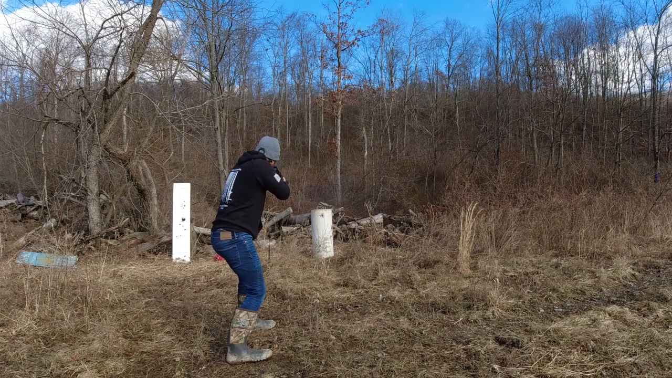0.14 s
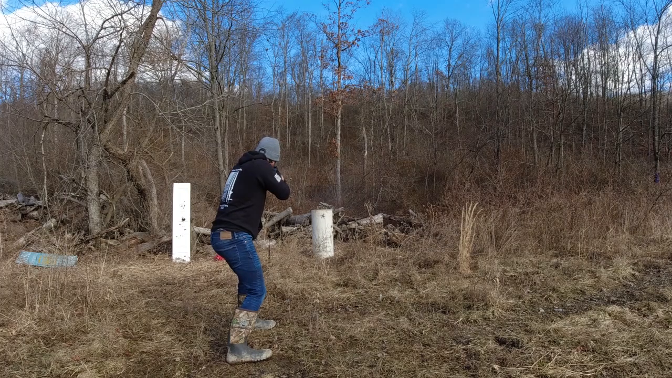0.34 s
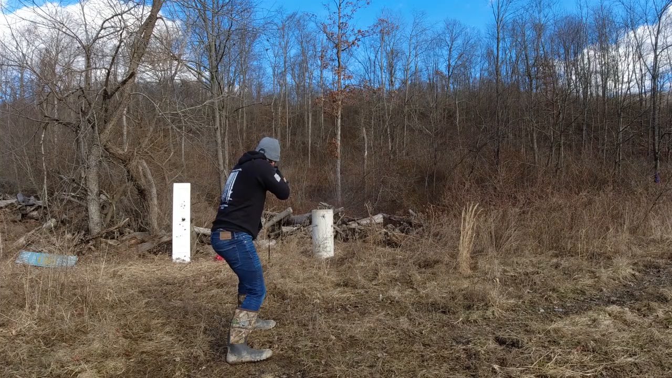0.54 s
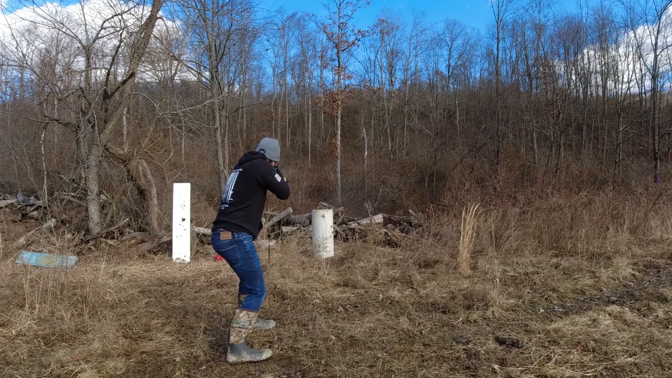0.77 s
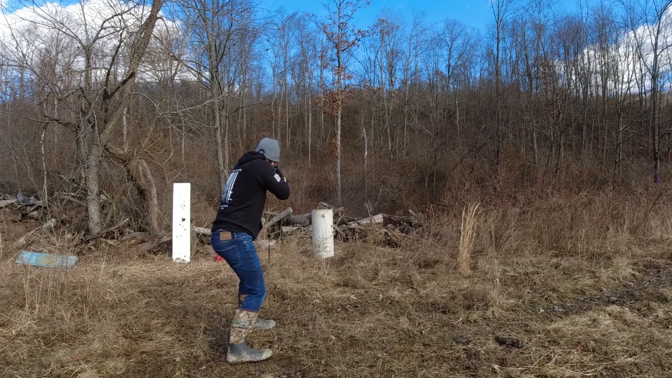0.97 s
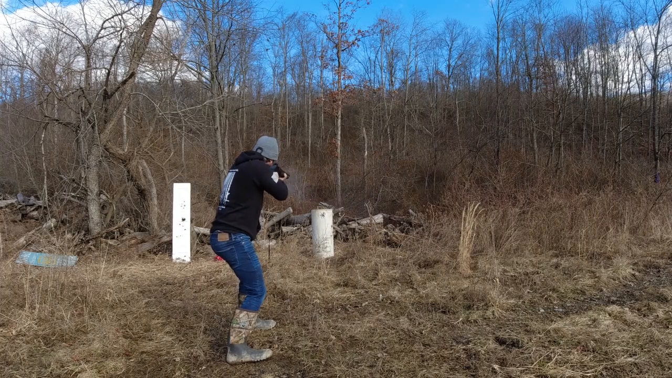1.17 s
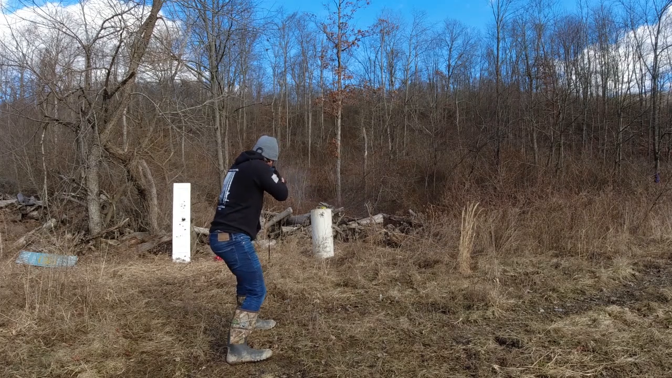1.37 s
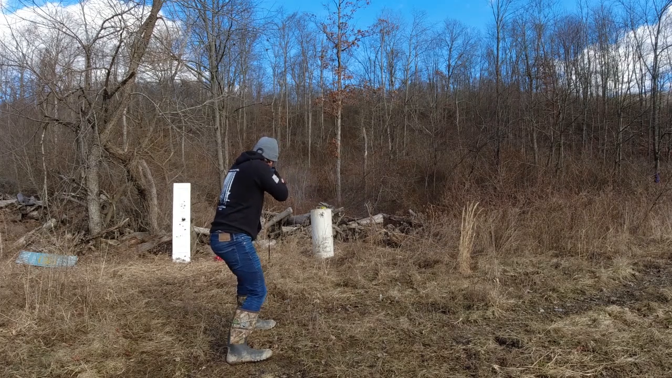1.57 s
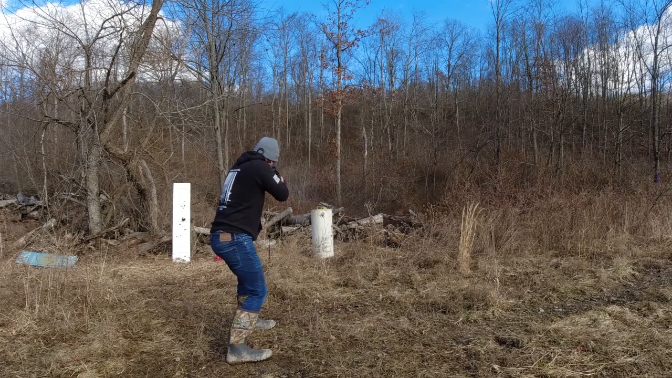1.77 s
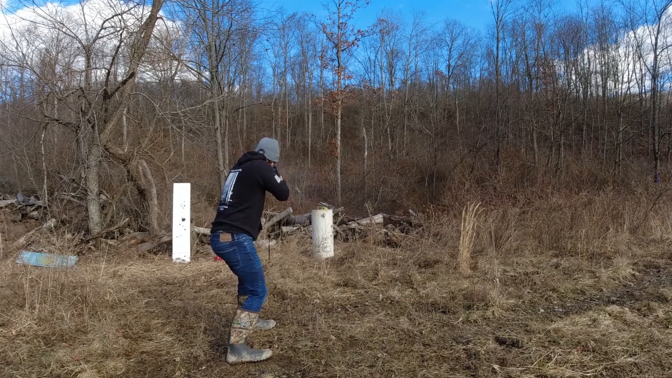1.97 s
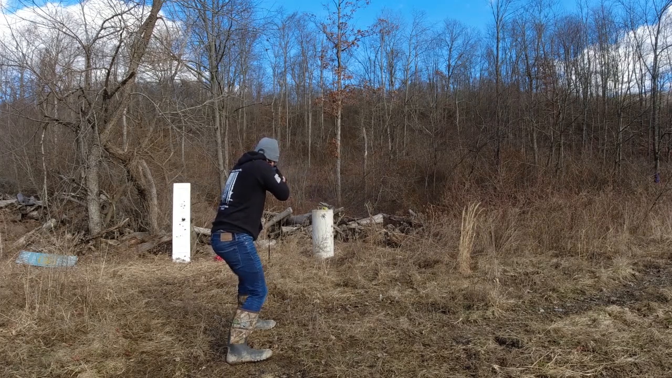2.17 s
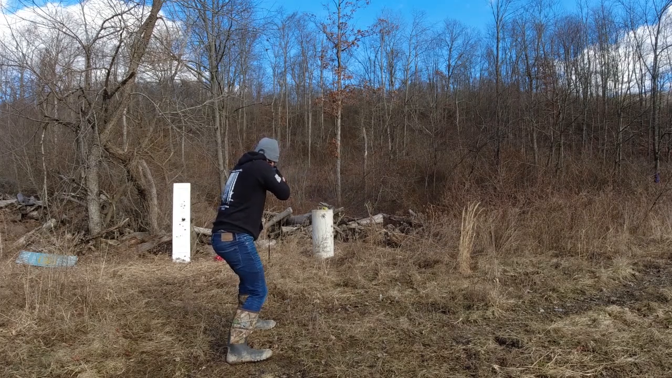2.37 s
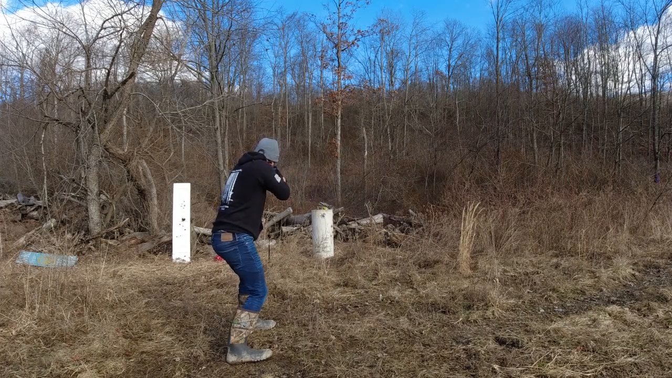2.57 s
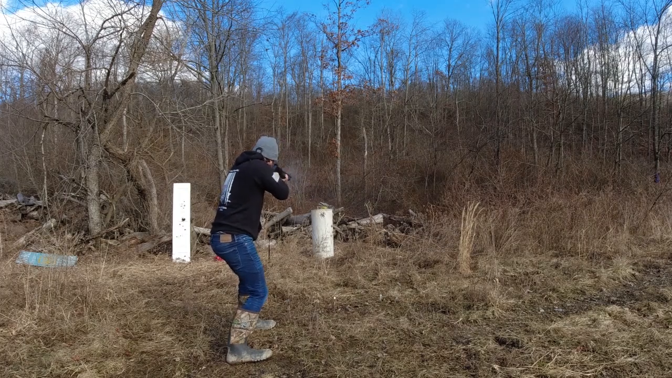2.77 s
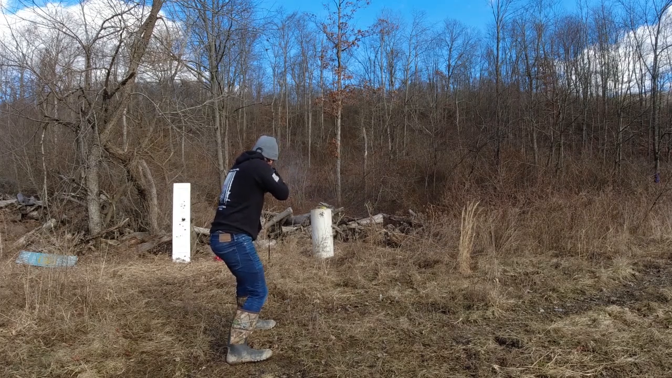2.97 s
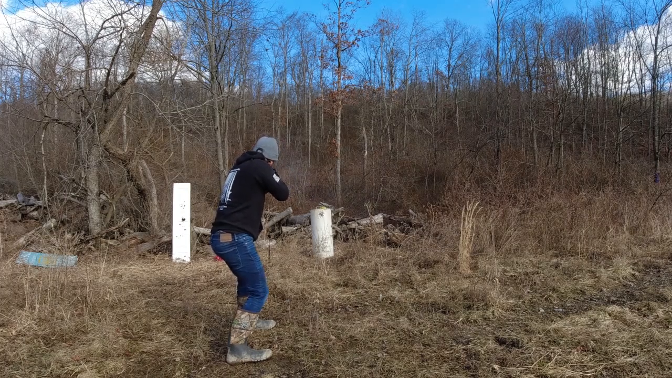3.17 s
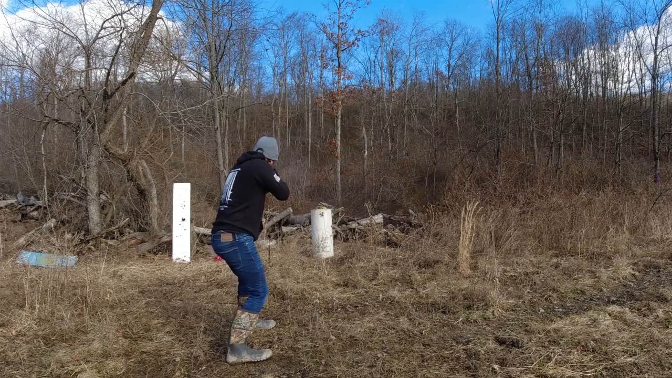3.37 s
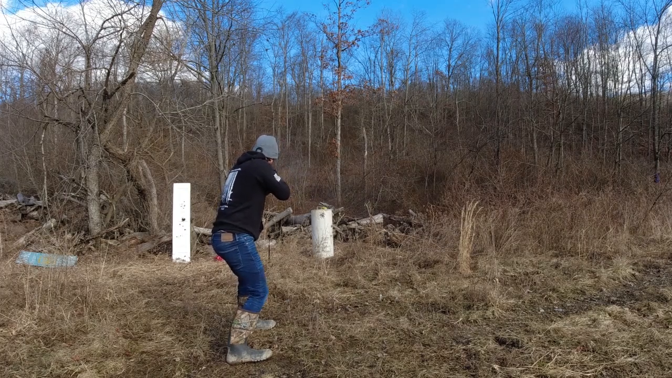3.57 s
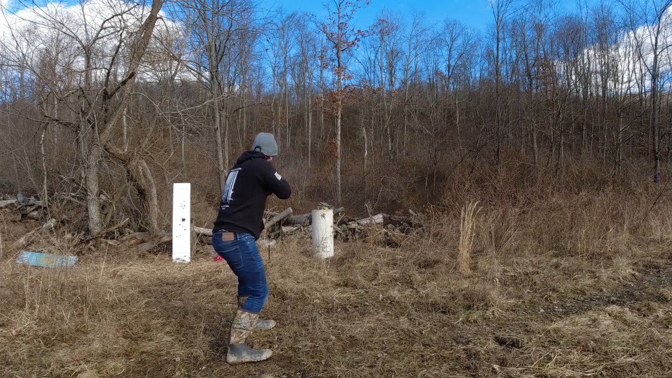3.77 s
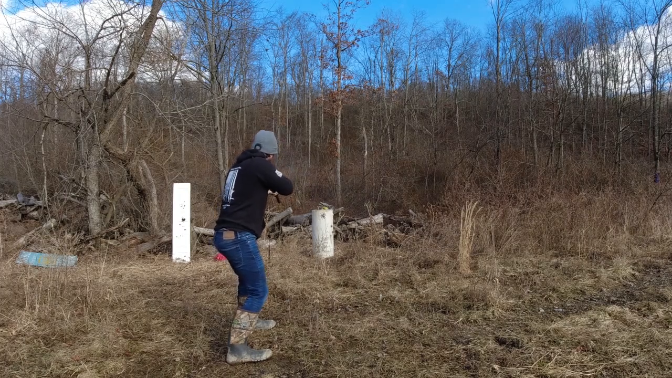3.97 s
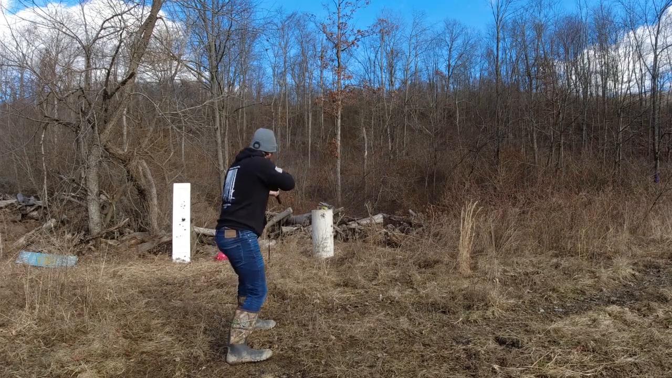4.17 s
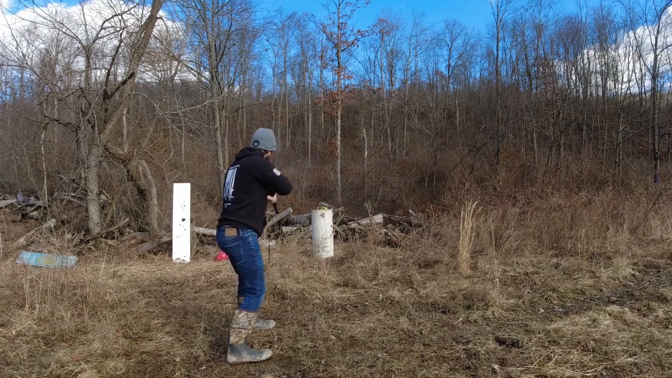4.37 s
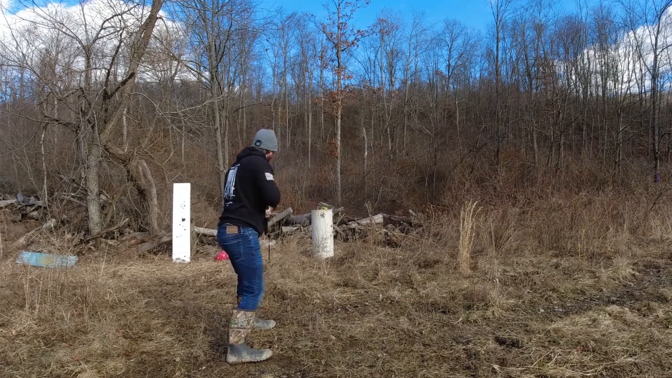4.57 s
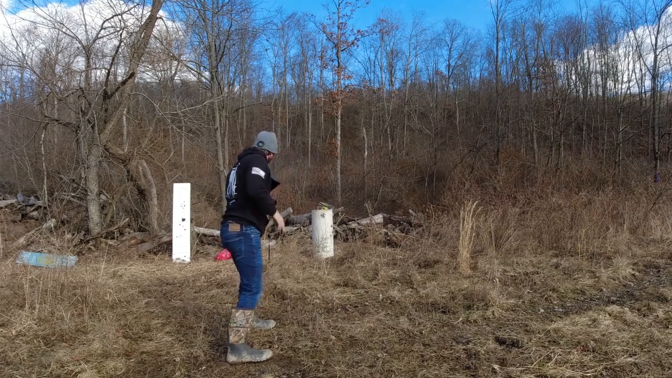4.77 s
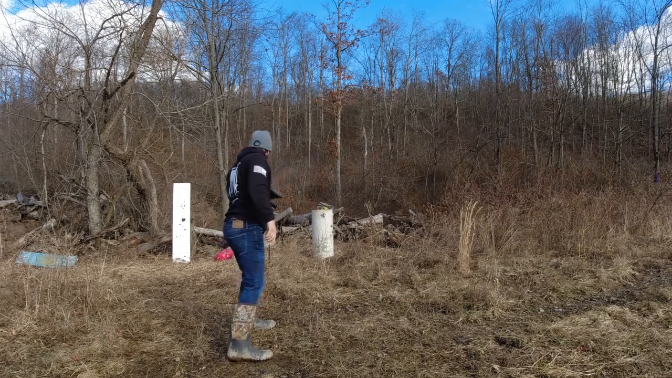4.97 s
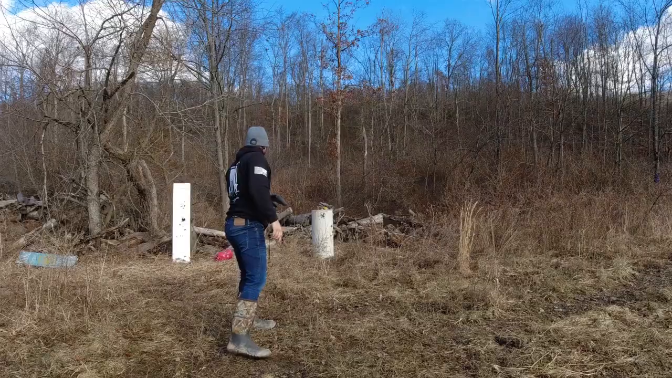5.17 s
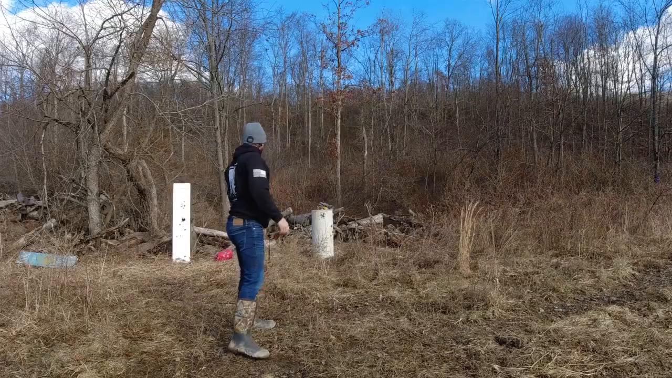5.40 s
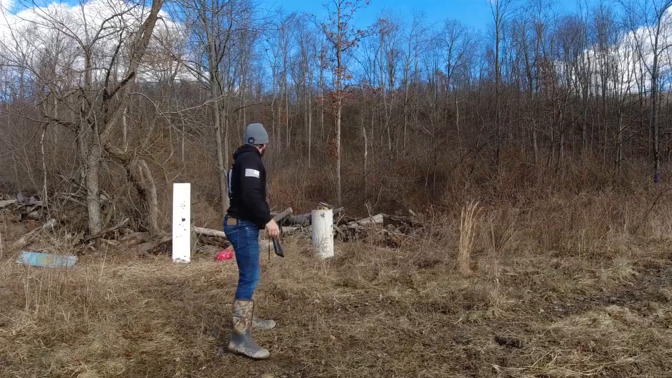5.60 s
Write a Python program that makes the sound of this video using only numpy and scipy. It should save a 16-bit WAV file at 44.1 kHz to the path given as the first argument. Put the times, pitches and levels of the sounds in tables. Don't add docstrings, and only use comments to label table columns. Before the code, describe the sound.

Outdoors in a clearing, an earlier shot's echo fades as a shotgun slide is racked back and forward with crisp steel clacks. A huge clipped blast follows, with tree slaps and rolling echo. The slide is racked again, a second blast fires, and one last backward clack follows. Stereo microphones near the shooter overload on the shots; faint distant traffic drones and swells at the end.

```python
import sys
import numpy as np
from scipy import signal
from scipy.io import wavfile

SR = 44100
rng = np.random.default_rng(int(sys.argv[2]) if len(sys.argv) > 2 else 0)


def to_wav(s):
    ch = np.atleast_2d(s).T
    pcm = np.round(np.clip(ch, -1, 1) * 32767)
    wavfile.write(sys.argv[1], SR, pcm.astype(np.int16))


def invert_db(x):
    u = np.asarray(x, float) / 20
    return 10 ** u


N = 248721
TIME = np.arange(N) / SR
BAND_EDGES = 19.5 * 2 ** np.arange(0, 9.8, .3724)
WHITE = rng.standard_normal((2, 2, N))

# f/Hz, density/dB per Hz
ROAD = [(20, 0.5), (28, 2.5), (45, -6.5), (70, -4.5), (100, -1), (160, -8), (300, -9), (450, -12),
        (800, -9.5), (1200, -16), (1700, -24), (2500, -38), (4000, -47.5), (9000, -59.5)]
# f/Hz, likeness/1
ROAD_LIKENESS = [(30, 0.88), (100, 1), (500, 0.81), (1500, 0.6), (5000, .4)]
ROAD_DB = -58
# t/s, f/Hz, level/dB
ENGINE = [
    (0, 76, -69),
    (0.998, 77, -61),
    (2.2, 77.5, -57.5),
    (3.501, 73, -64),
    (4.4, 72.5, -56.5),
    (5.0, 72, -53),
    (5.64, 73.7, -49),
]

# f/Hz, level/dB, t60/s
PLATE = (273, -48, 3.0)
PELLET_FLIGHT_S = .08
# t/s, peak level/dB, f/Hz
SHELL_THUDS = [
    (2.714, -42.5, 100),
    (4.374, -42.5, 96),
]

# t/s, peak level/dB, thrown shell level/dB
RACK_BACK = [
    (0.4184, -17.5, 7.5),
    (1.9676, -17.5, -0.5),
    (3.9579, -16.5, -47),
]
# t/s, peak level/dB
RACK_FORWARD = [
    (0.6537, -22),
    (2.2225, -19.5),
]
# t from slam/s, level below it/dB, low modes level/dB, loudest f/Hz
BACK_CONTACTS = [
    (-.0347, -14.5, -43.5, 3000),
    (0, -0.5, -16.5, 2300),
    (0.013, -16, -5, 2400),
]
EJECT_CONTACTS = [
    (.031, -17, 1, 1420),
    (0.048, -38, 18, 1390),
]
FORWARD_CONTACTS = [
    (-.0927, -19.5, -28, 2490),
    (-.068, -24, -21, 2720),
    (-.0456, -12.5, -32, 2400),
    (-.030, -27, -6, 1950),
    (-.018, -23, -6, 2330),
    (-.008, -9, -28, 2500),
    (0, 0, -19, 2530),
]
# t/s, peak level/dB, f/Hz
TICKS = [
    (0.5257, -49, 1140),
    (0.9413, -60, 2500),
    (4.463, -61, 3100),
    (4.515, -69.5, 3100),
    (4.73, -74, 4670),
]
# f/Hz, level/dB, t60/s
ACTION_MODES = [(920, -22, 0.09), (1263, 21, 0.075), (1498, -8, 0.016), (1842, -7, 0.047),
                (2360, 3.5, 0.029), (2765, -21, 0.037), (2840, -10, 0.01), (2850, -5.5, 0.044),
                (3145, -2.5, 0.03), (3780, -11, 0.055), (4670, -24, 0.11), (4700, -38, 0.18),
                (5450, -65, 0.21), (6700, -60, 0.08), (7700, 5, 0.049), (9300, -26, 0.19),
                (10560, 25, 0.12), (10460, -22, 0.091)]
HIGH_MODES_DB, TICK_LOW_DB, TICK_HIGH_DB = -21, -12.0, -45
# start from slam/s, end from slam/s, level/dB
RUB_BACK, RUB_EJECT = (-.048, .004, -53), (0.019, 0.07, -48.5)
RUB_FORWARD = [
    (-.093, -0.046, -55.5),
    (-.056, 0.038, -48.5),
]
# f/Hz, density/dB per Hz
RUB_COLOUR = [(880, -34), (1500, -4), (1720, -5), (1920, -1.5), (2830, -4), (4370, -12), (6830, -24),
              (12200, -9), (16000, -70)]
CLOTH_START_S, CLOTH_END_S, CLOTH_DB, CLOTH_DULL_HZ = 5.26, 5.44, -81, 4800

SHOTS = [
    -0.3,
    1.203,
    2.8155,
]
# first crack, later cracks, near slaps, far slaps, woodland roll, each level/dB
SHOT_DB = [
    (-60, -60, -60, -60, -0.5),
    (0.5, 0.5, -13, 2.5, -1.5),
    (0, -1.5, 1, 0.5, -1),
]

# f/Hz, density/dB per Hz
ROLL_COLOUR = [(35, -30), (70, -7.5), (150, -7), (450, -8), (860, -5), (3000, -17.5), (4300, -28.5),
               (16000, -40)]
# f/Hz, extra loss/dB per s
PATH_LOSS = [(80, 11.5), (400, -2), (1000, 1), (2000, 9.5), (3200, 18.5), (4500, 34.5), (8000, 49),
             (16000, 100)]
# f/Hz, likeness/1
ROLL_LIKENESS = [(60, 0.99), (180, 1), (550, 0.97), (1100, .75), (2200, 0.5), (4970, 0.1), (15000, 0.2)]
ROLL_DB, ROLL_ARRIVES_S, ROLL_SWELL_DB_PER_S = -30.5, .165, 231
NEAR_WOODS_S, NEAR_SAG_DB_PER_S = .43, 14.5
FAR_FALL_DB_PER_S, HILL_DB = 62.5, -63.5

# delay t/s, peak level/dB, f/Hz
TRUNKS = [(.0018, -6.5, 1040), (0.0288, -3, 1319), (0.035, -7.5, 501.5), (.0445, -9, 875),
          (.051, -4.5, 826), (0.0588, -2, 1170), (.100, -6, 630), (.104, -9, 850), (0.1076, -7, 1084),
          (0.1135, 1, 933.3), (.1205, -2.5, 958), (.1255, -1.5, 978.4), (.131, -13, 895), (.137, -9.5, 790),
          (.146, -15, 850), (.158, -10.5, 890), (.2045, -15.5, 760), (.2215, -14, 860), (.242, -13, 827),
          (.268, -30, 810), (.341, -16, 920), (.373, -28, 625), (.427, -24, 370)]
NEAR_S = .04

# t/s, length/s, push/1, right-to-left ratio/1
SHOVES = [
    (1.231, .045, .72, .78),
    (1.273, .064, -.86, 1.2),
    (2.818, .026, .12, .5),
    (2.843, .024, -.24, 1.4),
]
# t/s, push/1, time constant/s
CREEP = (1.338, .09, .16)
# t/s, peak level/dB, f/Hz, hold/s
BOOMS = [
    (1.228, -7.5, 356, 0.0023),
    (1.2535, -1.5, 252, 0.015),
    (2.865, -10, 281, 0.0098),
    (2.878, -4.5, 252, 0.0084),
    (2.913, -6, 256, 0.00048),
]
BOOM_SWELL_S, BOOM_CYCLES, BOOM_SAG_PER_S = .003, 6.4, 8.9

# delay t/s, level/dB, hold/s, t60/s
CRACKS = [
    (-.0005, -12.5, 0.005, .04),
    (.004, -17, 0.017, 0.052),
    (0.024, -14, .005, 0.02),
    (0.044, -17.5, .03, .25),
    (0.097, -23, 0.03, 0.22),
]
# f/Hz, density/dB per Hz
CRACK_COLOUR = [(180, -36.5), (300, -5), (749, -10), (900, 1), (1580, -1.5), (2740, -7), (3290, -2.5),
                (3640, -10.5), (8500, -22), (12700, -15.5), (16000, -20)]
# delay t/s, level/dB, hold/s, t60/s
NEAR_WASH = (.031, -17, .016, .04)
LEAD_S, LEAD_DB, LEAD_RISE_DB_PER_S = 0.023, -12, 1200

OVERLOAD = .76


def rms_one(x):
    return x / np.sqrt(np.mean(x ** 2) + 1e-20)


def at_hz(points, hz):
    f, value = np.array(points)[:, 0], np.array(points)[:, 1]
    return np.interp(np.log(hz), np.log(f), value)


def drift(rate):
    r = np.exp(-80 * np.pi * rate / SR)
    noise = rng.standard_normal(N // 40 + 2002)
    slow = signal.lfilter([1], [1, -2 * r, r * r], noise)[2000:]
    return np.interp(np.arange(N) / 40, np.arange(len(slow)), rms_one(slow))


def ring(clicks, hz, t60):
    r, w = invert_db(-60 / (t60 * SR)), 2 * np.pi * hz / SR
    return signal.lfilter([0, np.sin(w)], [1, -2 * r * np.cos(w), r * r], clicks + 1e-18)


def grains(size, per_s, spread_db):
    sizes = invert_db(spread_db * np.minimum(rng.exponential(1, size), 4)) * rng.choice([-1, 1], size)
    return sizes * (rng.random(size) < per_s / SR)


def bands(source, spectrum, likeness, extra_db=lambda hz: 0):
    out, power = 0, 0
    for k, (low, high) in enumerate(zip(BAND_EDGES, BAND_EDGES[1:])):
        hz = np.sqrt(low * high)
        if spectrum[0][0] <= hz <= spectrum[-1][0]:
            band = signal.butter(3, [low, high], "band", fs=SR, output="sos")
            mid, side = invert_db(at_hz(spectrum, hz)) * signal.sosfilt(band, source[k % 2])
            alike = np.clip(at_hz(likeness, hz), -1, 1)
            stereo = np.sqrt(1 + alike) * mid + np.sqrt(1 - alike) * side * [[1], [-1]]
            out = out + invert_db(extra_db(hz)) * stereo
            power += 2 * np.mean(mid ** 2)
    return out / np.sqrt(power)


def burst(level_db, hold, t60, length):
    t = TIME[:length] - LEAD_S
    lead = invert_db(LEAD_DB + LEAD_RISE_DB_PER_S * np.minimum(t, 0)) * (t < 0)
    decay = invert_db(-60 * np.maximum(t - hold, 0) / t60) * (t >= 0)
    return invert_db(level_db) * (lead + decay)


def add(out, s, piece):
    i = round(s * SR)
    out[..., i:i + piece.shape[-1]] += piece[..., :N - i]


def traffic():
    s, *columns = np.transpose(ENGINE)
    hz, engine_db = [np.interp(TIME, s, c) for c in columns]
    swell = drift(1.1)
    road = bands(WHITE[:, :, ::-1], ROAD, ROAD_LIKENESS, lambda hz: .4 * swell + 1.8 * drift(5.4))
    phase = 2 * np.pi * np.cumsum(hz + 2.0 * drift(12)) / SR
    engine = np.sqrt(2) * np.sin(phase)
    return road * invert_db(ROAD_DB) + engine * invert_db(engine_db + 0.56 * drift(6))


def plate():
    hz, level_db, t60 = PLATE
    hits = np.zeros(N)
    hits[[max(round((s + PELLET_FLIGHT_S) * SR), 0) for s in SHOTS]] = invert_db(level_db)
    return ring(hits, hz, t60)


def shells():
    out, length = np.zeros(N), SR // 6
    push = np.zeros(length)
    push[:60] = np.hanning(60) / 30
    for s, peak_db, hz in SHELL_THUDS:
        thud = ring(push, hz, .1) + 0.45 * ring(push, 2.3 * hz, 0.09) + .2 * ring(push, 3.6 * hz, .06)
        add(out, s, invert_db(peak_db + 4.0) * thud)
    return out


def rubs():
    start, end, db = RUB_BACK
    rows = [(s + start, s + end, db) for s, _, _ in RACK_BACK]
    start, end, db = RUB_EJECT
    rows += [(s + start, s + end, db + 0.2 * shell_db) for s, _, shell_db in RACK_BACK]
    return rows + [(s + start, s + end, db) for s, _ in RACK_FORWARD for start, end, db in RUB_FORWARD]


def rubbing():
    out = np.zeros((2, N))
    grit = 1.4 * rms_one(grains((2, 2, SR), per_s=5800, spread_db=5.0)) + .5 * WHITE[..., -SR:]
    noise = bands(grit, RUB_COLOUR, [(1500, 0.54), (6000, 0.19)]) * invert_db(1.4 * drift(60)[:SR])
    for k, (start, end, level_db) in enumerate(rubs()):
        stroke = signal.windows.tukey(round((end - start) * SR), .75)
        add(out, start, invert_db(level_db) * stroke * noise[:, 3000 * k:][:, :len(stroke)])
    length = round((CLOTH_END_S - CLOTH_START_S) * SR)
    brush = np.hanning(length) * invert_db(CLOTH_DB + 4.4 * drift(25)[:length])
    dull = signal.butter(4, CLOTH_DULL_HZ, fs=SR, output="sos")
    add(out, CLOTH_START_S, brush * signal.sosfilt(dull, noise[:, -length:]))
    return out


def contacts():
    strokes = [(s, db, BACK_CONTACTS) for s, db, _ in RACK_BACK]
    strokes += [(s, db + shell_db, EJECT_CONTACTS) for s, db, shell_db in RACK_BACK]
    strokes += [(s, db, FORWARD_CONTACTS) for s, db in RACK_FORWARD]
    rows = [(s + lag, db + below_db, low_db, HIGH_MODES_DB, hz)
            for s, db, parts in strokes for lag, below_db, low_db, hz in parts]
    return rows + [(s, db, TICK_LOW_DB, TICK_HIGH_DB, hz) for s, db, hz in TICKS]


def action():
    out, length = np.zeros((2, N)), SR // 10
    small = signal.butter(2, 420, "high", fs=SR, output="sos")
    tiny = signal.butter(3, 1400, "high", fs=SR, output="sos")
    bright = signal.butter(1, [5000, 11500], "band", fs=SR, output="sos")
    for s, peak_db, low_db, high_db, struck_hz in contacts():
        rattle = grains(length, per_s=4400, spread_db=0.5) * burst(0, 0.0014, 0.042, length)
        chance = rng.standard_normal((len(ACTION_MODES), 3))
        body = np.zeros((2, length))
        for (hz, level_db, t60), (left, right, detune) in zip(ACTION_MODES, chance):
            if hz < 1500:
                colour_db = low_db - 3
            elif hz > 5500:
                colour_db = high_db + 2
            else:
                colour_db = -8.0 * abs(np.log2(hz / struck_hz))
            strength = invert_db(0.5 * level_db + colour_db + 2.0 * np.array([[left], [right]]))
            body += strength * ring(rattle, hz * (1 + .02 * detune), min(.5 * t60, 24 / hz))
        body = signal.sosfilt(small if low_db > -22 else tiny, body)
        hiss = signal.sosfilt(bright, rng.standard_normal((2, length)))
        snap = hiss * burst(high_db - 2.0, 0.014, 0.04, length)
        add(out, s - LEAD_S, invert_db(peak_db + 0.5) * (body / np.abs(body).max() + snap))
    t = TIME[:SR // 3]
    twigs = signal.sosfilt(bright, rng.standard_normal((2, len(t))))
    scatter = twigs * invert_db(-41 - 60 * t / 0.37) * np.minimum(t / 0.0031, 1)
    return out + signal.oaconvolve(out, scatter, axes=1)[:, :N]


def roll_db(since):
    swell = ROLL_SWELL_DB_PER_S * np.minimum(since - ROLL_ARRIVES_S, 0)
    sag = NEAR_SAG_DB_PER_S * np.clip(since - ROLL_ARRIVES_S, 0, NEAR_WOODS_S - ROLL_ARRIVES_S)
    return ROLL_DB + swell - sag - FAR_FALL_DB_PER_S * np.maximum(since - NEAR_WOODS_S, 0)


def woods():
    last = np.searchsorted(SHOTS, TIME) - 1
    since = TIME - np.array(SHOTS)[last]
    returns = rms_one(grains((2, N), per_s=510, spread_db=0.0))
    source = 0.55 * returns + 0.87 * WHITE[:, ::-1]
    surge = drift(4.0)

    def change_db(hz):
        return -at_hz(PATH_LOSS, hz) * (since - .2) + 1.3 * surge + 2.5 * drift(17)

    roll = bands(source, ROLL_COLOUR, ROLL_LIKENESS, change_db)
    near = invert_db(roll_db(since) + np.array(SHOT_DB)[last, -1])
    hills = invert_db(HILL_DB - 9.0 * since)
    return roll * invert_db(4.5) * (near + hills)


def slaps():
    out, length = np.zeros((2, N)), SR // 25
    dull = signal.butter(8, 3450, fs=SR, output="sos")
    for delay, peak_db, hz in TRUNKS:
        clicks = grains((2, length), per_s=1300, spread_db=3.0) * invert_db(-60 * TIME[:length] / 0.017) * .5
        clicks = clicks[0] + .09 * clicks[1] * [[1], [-1]]
        clicks[:, 0] = 1.1
        pulse = ring(clicks, hz, 7.2 / hz) + 0.31 * ring(clicks, 2.1 * hz, 7.1 / hz)
        pulse = signal.sosfilt(dull, pulse + .2 * ring(clicks, 3000, .007))
        for shot, (_, _, near_db, far_db, _) in list(zip(SHOTS, SHOT_DB))[1:]:
            level_db = peak_db + (near_db if delay < NEAR_S else far_db)
            add(out, shot + delay, invert_db(level_db) * pulse / np.abs(pulse).max())
    return out


def blast():
    out, wobble, apart = np.zeros((2, N)), drift(53), drift(90) * [[1], [-1]]
    for s, length, push, right in SHOVES:
        arch = np.sin(np.pi * TIME[:round(length * SR)] / length) ** 0.69
        add(out, s, push * arch * [[1], [right]])
    creep_s, creep_push, creep_tau = CREEP
    after = np.maximum(TIME - creep_s, 0)
    out += creep_push * (1 - np.exp(-after / .012)) * np.exp(-after / creep_tau)
    t = TIME[:SR // 5]
    for s, peak_db, hz, hold in BOOMS:
        t60, i = BOOM_CYCLES / hz, round(s * SR)
        sagging_hz = hz * np.exp(-BOOM_SAG_PER_S * t)
        phase = 2 * np.pi * np.cumsum(sagging_hz * (1 + 0.07 * wobble[i:i + len(t)])) / SR
        phase = phase + 0.09 * apart[:, i:i + len(t)]
        decay = invert_db(peak_db - 60 * np.maximum(t - BOOM_SWELL_S - hold, 0) / t60)
        add(out, s, -np.sin(phase) * np.minimum(t / BOOM_SWELL_S, 1) * decay)
    return out


def cracks():
    out, length = np.zeros((2, N)), SR // 3
    likeness = [(500, .94), (1000, 0.59), (2000, 0.49), (5000, 0.25)]
    noise = bands(WHITE[..., :SR], CRACK_COLOUR, likeness) * invert_db(2.0 * drift(250)[:SR])
    fired = list(zip(SHOTS, SHOT_DB))[1:]
    rows = [(shot + delay, db + (later_db if k else first_db), hold, t60)
            for shot, (first_db, later_db, *_) in fired
            for k, (delay, db, hold, t60) in enumerate(CRACKS)]
    delay, db, hold, t60 = NEAR_WASH
    rows += [(shot + delay, db + part[2], hold, t60) for shot, part in fired]
    for k, (s, level_db, hold, t60) in enumerate(rows):
        piece = noise[:, 2500 * k:][:, :length]
        add(out, s - LEAD_S, piece * burst(level_db, hold, t60, length))
    return out


def scene():
    background = traffic() + plate() + shells()
    handling = rubbing() + action()
    return background + handling + woods() + slaps() + blast() + cracks()


def band_limit(x):
    return signal.sosfilt(signal.butter(12, 16260, fs=SR, output="sos"), x)


def record(dry):
    drive = np.abs(dry) / OVERLOAD
    clipped = OVERLOAD * np.tanh(drive ** 1.5) ** (1 / 1.5) * np.sign(dry)
    top_cut = signal.cheby2(12, 60, 16300, fs=SR, output="sos")
    return band_limit(signal.sosfilt(top_cut, clipped))


dry = scene()
out = record(dry)
to_wav(out)
```